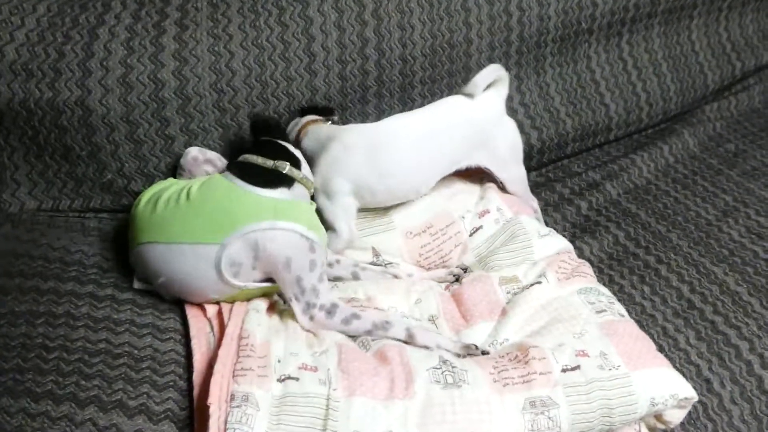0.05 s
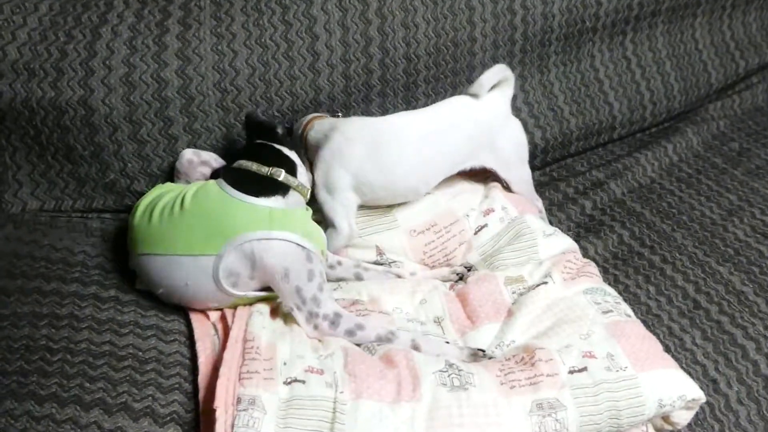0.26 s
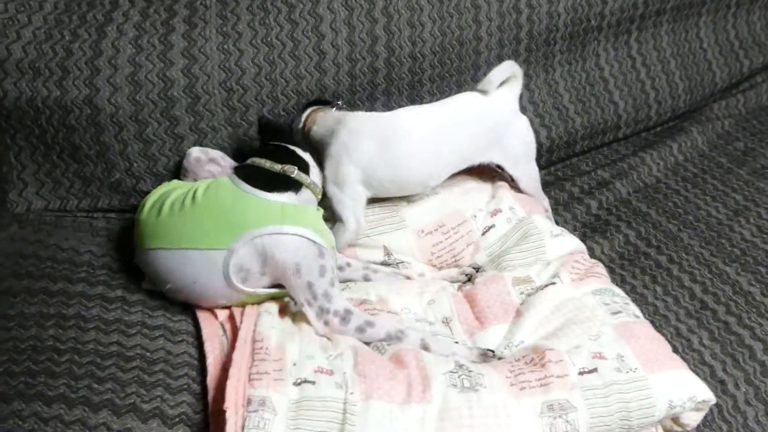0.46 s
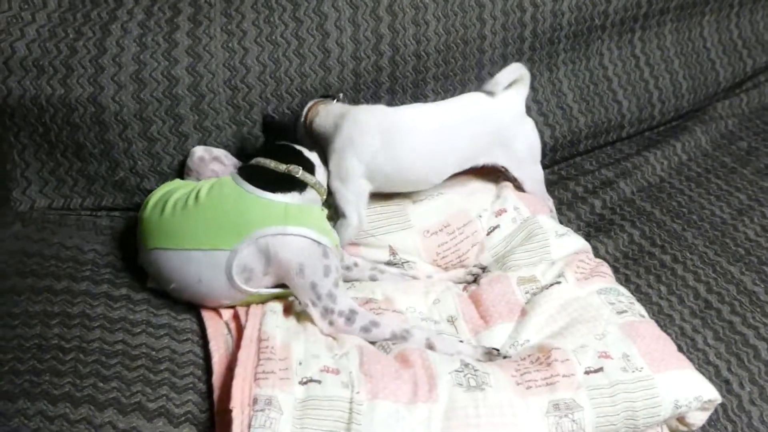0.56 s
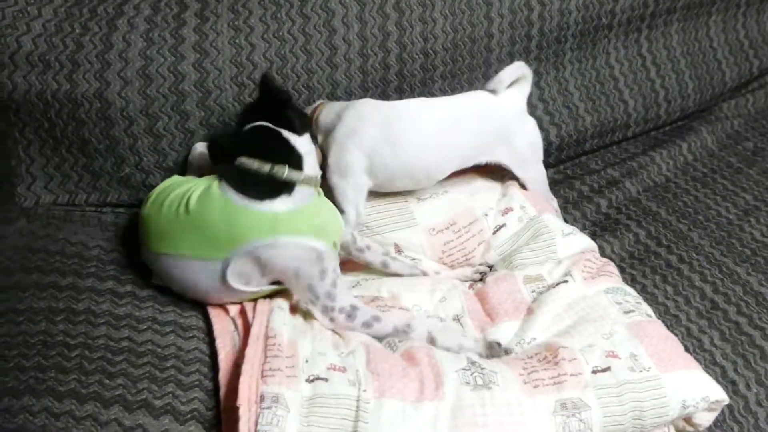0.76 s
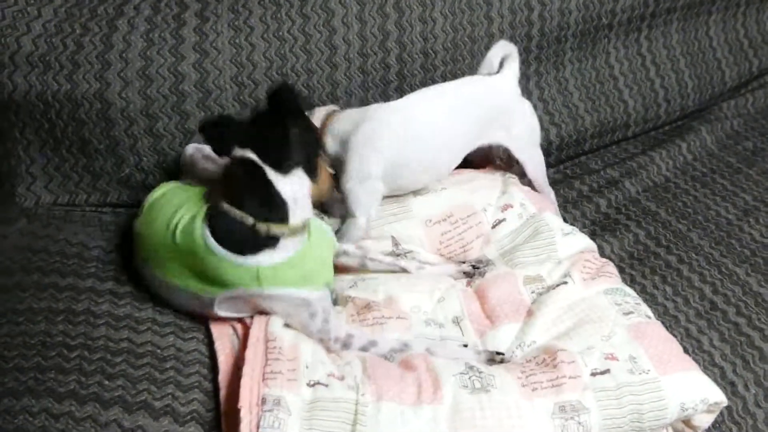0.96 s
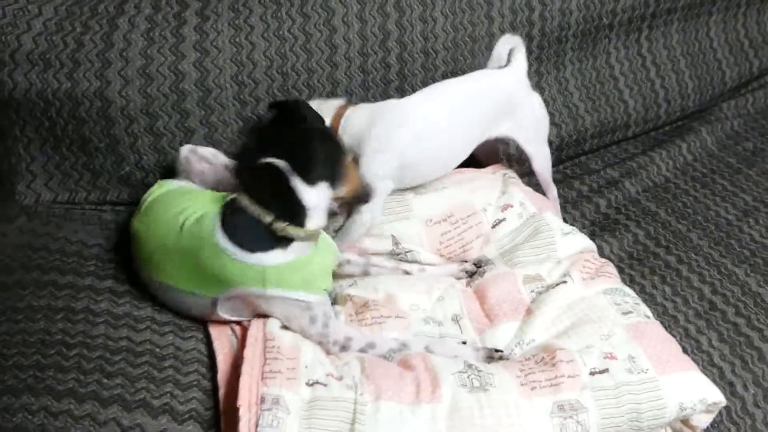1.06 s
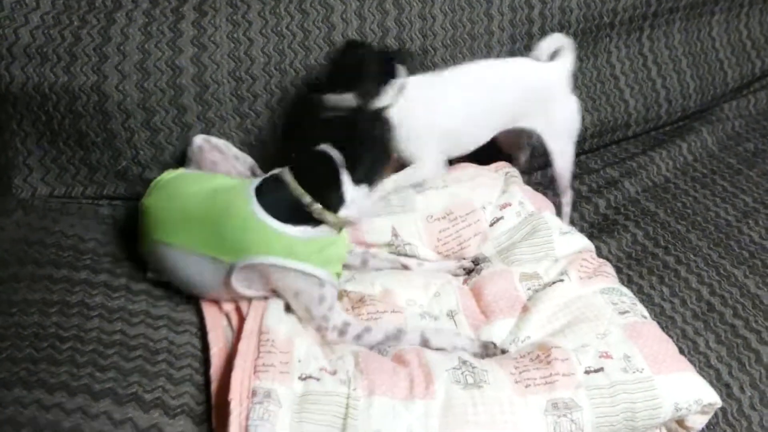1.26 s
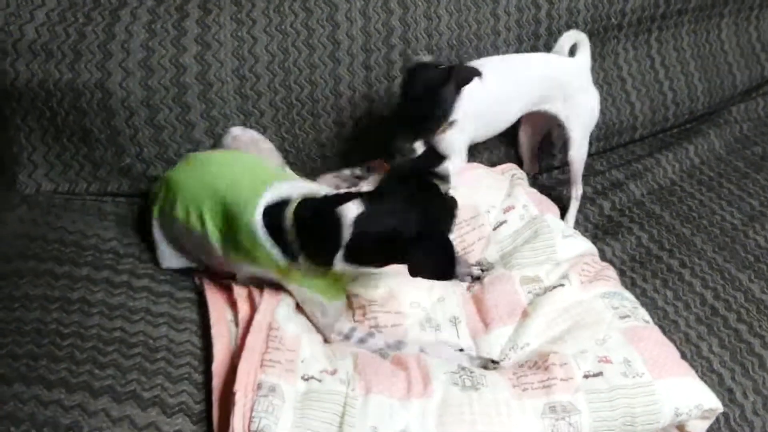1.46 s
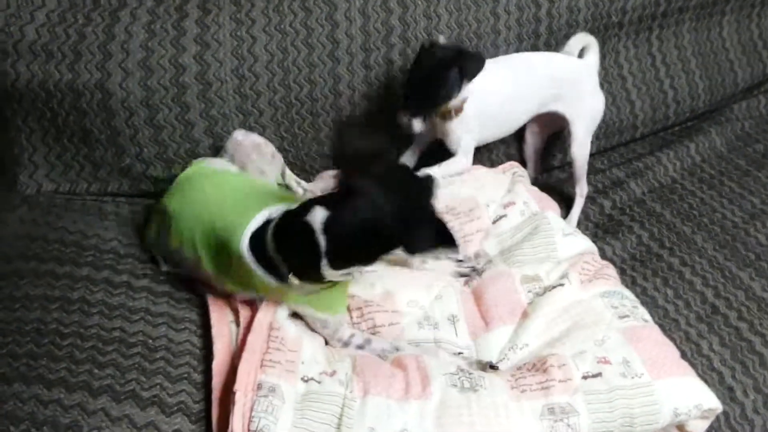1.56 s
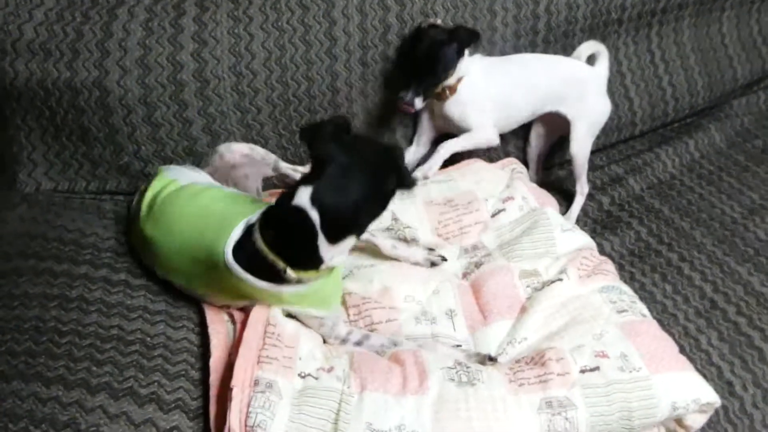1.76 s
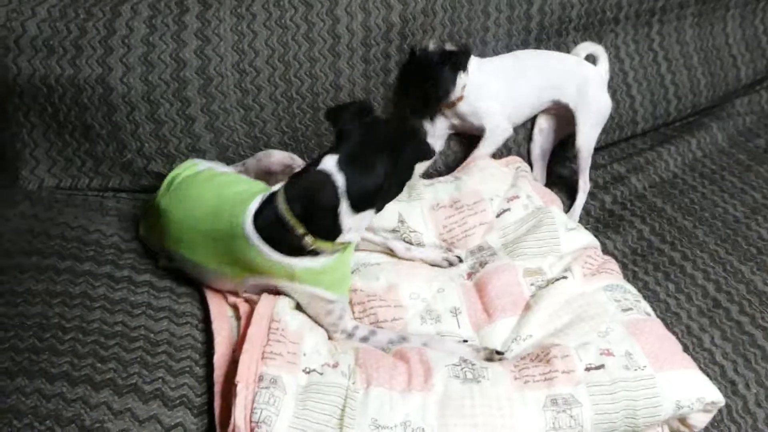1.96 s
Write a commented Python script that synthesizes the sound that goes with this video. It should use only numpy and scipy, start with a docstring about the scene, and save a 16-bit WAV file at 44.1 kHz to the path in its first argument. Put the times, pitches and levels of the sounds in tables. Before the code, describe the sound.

A small collar bell jingles in quick pings as two dogs tussle on a sofa.

```python
"""Two small dogs tussling on a sofa

A little collar bell with a loose pellet, damped by fur, jingles in quick pings.
At the height of the game one dog gives a fluttering snort and a hissing puff through its nose.
Mouths click, paws thud on the cushion, claws tick and fur rustles against a quilt.
Behind it all is a quiet room with a faint hum."""
import sys
import numpy as np
from scipy import signal
from scipy.io import wavfile

SR = 44100
rng = np.random.default_rng(int(sys.argv[2]) if len(sys.argv) > 2 else 0)


def digitize_waveform(pressure):
    """Quantize a signal to 16-bit integers and store it at the path in sys.argv[1].

    Rows of a 2-D input are taken as channels; values are limited to [-1, 1].
    """
    field = np.atleast_2d(pressure).T
    bounded = np.clip(field, -1, 1)
    quanta = np.round(bounded * 32767).astype(np.int16)
    wavfile.write(sys.argv[1], SR, quanta)


N = 88200
T = np.arange(N) / SR

# Quick pings of the collar bell: strikes and their close echoes.
# start_s, level_db, upper_tones_db, ring_s (the time a sound takes to fade by 60 dB)
BELL_PINGS = [(0.0675, -52.5, 14, 0.036), (.076, -51.5, 17, 0.019), (.113, -46, 13.5, 0.046),
              (0.122, -53, -4, 0.014), (.166, -35.5, 1, 0.044), (0.2043, -30.5, 1.5, 0.024),
              (.2115, -34.5, -8, 0.038), (.229, -27.5, -8, 0.017), (0.237, -26.5, -1, 0.011),
              (.3125, -38.5, 2, 0.02), (0.3233, -27, -8, 0.0081), (.350, -36, -5, 0.018),
              (0.3849, -27, -20, 0.021), (.3895, -22, -14, 0.027), (.3985, -25.5, -20, 0.013),
              (.4145, -34, -16, 0.014), (.431, -37, -16, 0.035), (0.4483, -30, -17, 0.022),
              (.456, -29, 5, 0.011), (.470, -33.5, -4, 0.037), (0.497, -28.5, -17, 0.017),
              (.579, -29.5, -17, 0.021), (.6015, -38.5, -19, 0.032), (0.616, -29.5, -15, 0.015),
              (0.6229, -29, -21, 0.035), (.6295, -24.5, 3.5, 0.017), (.6825, -26, 3, 0.014),
              (.6985, -26.5, 2, 0.016), (.7028, -24, -12, 0.024), (.720, -36, -12, .025),
              (.7362, -24, -10, 0.035), (.749, -12.5, 0, 0.018), (.7575, -20.5, -27, 0.043),
              (.7615, -21, -22, 0.044), (.7765, -26.5, -19, 0.02), (.8639, -48.5, 18, 0.035),
              (.8815, -32.5, -6, 0.036), (0.9457, -36.5, 4, 0.025), (.9842, -39.5, 10, 0.014),
              (0.9914, -40.5, 4.5, 0.069), (1.1139, -31, 0.5, 0.018), (1.184, -44.5, -18, 0.1),
              (1.2005, -21.5, -5, 0.022), (1.2085, -22.5, -3, 0.038), (1.2505, -22.5, 4, 0.015),
              (1.2555, -17, -24, 0.018), (1.2655, -28.5, -6, .04), (1.2968, -15.5, -3.5, 0.011),
              (1.357, -36, 10, 0.022), (1.397, -27.5, 10, 0.047), (1.4, -15, 10.5, 0.0091),
              (1.4384, -31, -16, 0.026), (1.563, -45, -10, 0.023), (1.5705, -38.5, -17, 0.028),
              (1.5776, -22.5, -8, 0.01), (1.6568, -36.5, -4, 0.039), (1.6888, -14, -18, 0.0098),
              (1.7105, -29.5, -15, 0.025), (1.7265, -19.5, -32, 0.012)]
# The bell's main tone and its two upper tones: pitch_hz, level_db, share_of_ring_time
BELL_TONES = [(6555, 3.5, 0.93), (6776, -4.5, 1), (6928, -8, 0.84)]


def collar_bell():
    """The shell rings briefly at each ping, then twice more softly as its loose pellet bounces."""
    attack_s, bounce_gap_s, bounce_db = 0.0008, 0.008, -12
    shell, contact, shimmer = np.zeros((3, N))
    fade_in = 1 - np.exp(-T[:N // 16] / attack_s)
    for start_s, db, upper_db, ring_s in BELL_PINGS:
        for bounce in range(3):
            tuning = 1 + 0.0068 * rng.standard_normal()   # fur pulls the pitch a little
            loudness = from_db(db + bounce_db * bounce) * fade_in
            for k, (hz, tone_db, share) in enumerate(BELL_TONES):
                extra_db = (k > 0) * (upper_db + 2 * rng.standard_normal())
                tone = ring(hz * tuning, share * ring_s)
                add(shell, start_s, loudness * from_db(tone_db + extra_db) * tone)
            add(contact, start_s, loudness * burst(ring_s=0.017))
            add(shimmer, start_s, loudness * burst(ring_s))   # a cluster of very high shell tones
            start_s += bounce_gap_s * rng.uniform(.5, 1.5)
    return (butter(shell, (5410, 8570), "band")   # the range a small shell sends out well
            + from_db(-20) * butter(contact, (7560, 10400), "band")
            + from_db(-23) * butter(shimmer, (15000, 16600), "band"))


# Flutters of the snort: start_s, level_db
SNORT_FLUTTERS = [(1.2831, -24), (1.2866, -22.5), (1.2929, -23), (1.3, -33)]
# Tones that ring in the muzzle: pitch_hz, level_db, ring_s
MUZZLE_TONES = [(215, -11, 0.072), (1326, -11, 0.032), (2380, -5, 0.0098), (2710, -3, 0.0083),
                (3860, -8.5, 0.0057)]


def snort():
    """A few quick pulses of air ring the muzzle."""
    pulses = [(start_s, db, 0) for start_s, db in SNORT_FLUTTERS]
    return cavity_pulses(pulses, MUZZLE_TONES, scatter_db=2.5, air_db=-22)


def snort_thump():
    """Each flutter of the snort also pushes a little air, making a low thump."""
    out = np.zeros(N)
    for start_s, db in SNORT_FLUTTERS:
        add(out, start_s, from_db(db - 26) * ring(hz=78, ring_s=0.073))
    return out


# Tone colour of the rushing breath: pitch_hz, level_db
BREATH_COLOUR = [(60, -2), (250, -10), (600, 1.5), (1400, 3.5), (2700, -1), (4100, 5), (5100, 2), (7500, 0),
                 (10500, -21), (12500, -27), (16000, -19)]
# Tone colour of the thin hiss at the nostrils: pitch_hz, level_db
HISS_COLOUR = [(3000, -32), (6000, -19), (8500, 7), (10200, 11), (12500, 0), (16000, -21)]
# Narrow bands where the nose rings: pitch_hz, width_hz, level_db
NOSE_BANDS = [(2660, 240, -8), (3930, 270, -16), (5080, 130, -7.5), (9050, 170, -16), (9940, 450, -7.5)]


def nose_puff():
    """Air blown through the nose: a rasp that swells and dies away, thinning to a hiss."""
    start_s, hold_s, length_s = 1.362, 0.0073, 0.12
    t = np.maximum(T - start_s, 0)

    def swell(db, attack_s, fall_db_per_s):
        """Loudness that rises, holds briefly and falls."""
        rise = np.minimum(t / attack_s, 1) ** 1.6
        return rise * from_db(db - fall_db_per_s * np.maximum(t - attack_s - hold_s, 0))

    nose = 0
    for hz, width, db in NOSE_BANDS:
        band = butter(rng.standard_normal(N), (hz - width / 2, hz + width / 2), "band", order=1)
        nose += from_db(db) * rms_one(band)
    flap_hz = 190 * (1 + .3 * drift(per_s=190))   # the nostrils flap unevenly
    flap_db = 2 * np.sin(2 * np.pi * np.cumsum(flap_hz) / SR)
    rasp = (coloured_noise(BREATH_COLOUR) + butter(nose, 11300, "low", order=4)) * from_db(flap_db)
    hiss = coloured_noise(HISS_COLOUR) * from_db(2.5 * drift(per_s=500))   # moisture makes it sputter
    rasp *= swell(db=-35.5, attack_s=0.033, fall_db_per_s=215)
    hiss *= swell(db=-48.5, attack_s=0.042, fall_db_per_s=113)
    breath_runs_out = from_db(-301 * np.maximum(t - length_s, 0))
    return (rasp + hiss) * breath_runs_out


# Wet clicks of the mouths: start_s, level_db, brightness_db_per_octave
MOUTH_CLICKS = [(.0998, -46, -2), (.1075, -63, 2), (.1215, -57, 5.5), (1.8442, -52, 0), (1.8718, -47.5, 2)]
# Tones that ring in the mouth: pitch_hz, level_db, ring_s
MOUTH_TONES = [(254, -0.5, 0.029), (750, 4, 0.016), (1460, -5, 0.024), (2200, 4, 0.0062),
               (2520, 4.5, 0.015), (5230, 3, 0.0057)]


def mouth_clicks():
    """Each wet smack briefly rings the hollow of the mouth."""
    return cavity_pulses(MOUTH_CLICKS, MOUTH_TONES, scatter_db=3.5, air_db=-29)


# Paws landing: start_s, level_db, pitch_hz, pat_db, ring_s
PAW_LANDINGS = [(1.221, -39, 217, -25, 0.033), (1.3477, -33, 360, -1.5, .035),
                (1.375, -51, 168, -13, 0.056), (1.42, -33.5, 220, -10, .05)]


def paws():
    """A paw lands with a soft pat and the cushion gives a dull ring."""
    out = np.zeros(N)
    for start_s, db, hz, pat_db, ring_s in PAW_LANDINGS:
        pat = butter(burst(ring_s=0.0062), (hz, 3 * hz), "band")
        pat /= np.abs(pat).max()
        add(out, start_s, from_db(db) * (ring(hz, ring_s) + from_db(pat_db) * pat))
    return out


# Ticks of claws and collar fittings: start_s, level_db, lowest_hz, highest_hz
CLAW_AND_COLLAR_TICKS = [(0.385, -34.5, 4800, 9500), (0.451, -36, 5070, 9400), (0.6184, -39, 7000, 11400),
                         (0.678, -36, 1000, 9000), (.7308, -33, 4500, 5530), (0.7308, -35, 1090, 7700),
                         (0.7473, -33, 4050, 5240), (0.7565, -50, 7000, 10800), (0.856, -40, 6000, 10000),
                         (0.984, -37.5, 7000, 9700), (1.194, -32, 11400, 13600), (1.4003, -29, 7450, 10700),
                         (1.556, -37, 7040, 10000)]


def ticks():
    """Claws and collar fittings make tiny dry contacts, each with its own brightness."""
    out = np.zeros(N)
    for start_s, db, low_hz, high_hz in CLAW_AND_COLLAR_TICKS:
        add(out, start_s, from_db(db) * butter(burst(ring_s=0.009), (low_hz, high_hz), "band"))
    return out


# How loudly fur rubs on the quilt: time_s, level_db
RUSTLE_LOUDNESS = [(0, -56), (.34, -57), (.40, -54.5), (.46, -52.5), (.55, -56.5), (.63, -54.5),
                   (.67, -54.5), (.75, -50.5), (.82, -52.5), (.9, -53.5), (1.07, -54), (1.17, -51.5),
                   (1.21, -49.5), (1.33, -47.5), (1.45, -45.5), (1.52, -48.5), (1.6, -49.5), (1.8, -53),
                   (2, -51.5)]
# Tone colour of the cloth: pitch_hz, level_db
CLOTH_COLOUR = [(60, -20), (220, 17.5), (500, 9), (1500, 4), (4000, -3), (7500, 0), (10000, -15),
                (13000, -5), (16000, -37)]


def quilt_rustle():
    """Fur and cloth catch and slip in fine grains."""
    grain_db = 1.5 * drift(per_s=170)
    return from_db(at_times(RUSTLE_LOUDNESS) + grain_db) * coloured_noise(CLOTH_COLOUR)


# How loudly a body slides: time_s, level_db
SLIDE_LOUDNESS = [(1.66, -85), (1.77, -55.5), (1.86, -62), (2, -61)]


def cushion_slide():
    """A dog slides over the cushion with a dull swish."""
    swish = butter(rng.standard_normal((2, N)), (480, 960), "band")
    return from_db(at_times(SLIDE_LOUDNESS)) * rms_one(swish)


# Tones of the hum: pitch_hz, level_db
HUM_TONES = [(205, -67.5), (300, -60.5), (400, -76)]
# Tone colour of the room's hiss: pitch_hz, level_db
ROOM_COLOUR = [(25, -12), (60, -4.5), (130, -0.5), (200, 1), (320, 7.5), (500, 8.5), (900, -9), (2000, -7),
               (3400, -47), (5000, -7), (10000, -13.5), (13000, -15), (16000, -22)]


def room_tone():
    """Soft hiss and the wavering hum of an appliance."""
    hum, left_right_phase = 0, np.array([[0], [1.4]])
    for hz, db in HUM_TONES:
        waver = 0.84 * drift(per_s=8.13)
        hum += from_db(db) * np.sqrt(2) * np.sin(2 * np.pi * hz * T + waver + left_right_phase)
    return hum + from_db(-57) * coloured_noise(ROOM_COLOUR)


# Echoes from nearby surfaces: delay_s, relative_level_db
NEAR_ECHOES = [(.0076, -3), (.0102, -18.5), (.0135, -34), (.0195, -37), (.027, -20)]


def room(sound, echo_db, tail_db):
    """A sound arrives directly, then as a few echoes and a short blurred tail."""
    ring_s, tail_delay_s = 0.16, 0.0062
    t = T[:N // 4]
    tail = rng.standard_normal((2, len(t))) * from_db(-60 * t / ring_s) * (t > tail_delay_s)
    response = from_db(tail_db) * stereo(*rms_one(tail), alike=0.87) / np.sqrt(len(t))
    response[:, 0] += 1   # the direct sound
    for delay_s, db in NEAR_ECHOES:
        response[:, int(delay_s * SR)] += from_db(db + echo_db)
    return signal.fftconvolve(sound[None], response, axes=1)[:, :N]


# How alike left and right are (1 the same, -1 opposite): pitch_hz, likeness
STEREO_LIKENESS = [(50, -0.35), (150, -0.75), (300, -0.64), (600, -0.6), (1200, -0.54), (3000, 0.39),
                   (6500, 0.56), (10000, 0.24), (15000, 0.23)]


def coloured_noise(colour):
    """Stereo noise of power 1, built band by band to follow a tone colour."""
    out, edges = 0, np.geomspace(22, 17000, 25)
    white = rng.standard_normal((2, 2, N))
    for k, band in enumerate(zip(edges, edges[1:])):
        hz = np.sqrt(band[0] * band[1])
        mid, side = butter(white[k % 2], band, "band", order=3)
        out += from_db(at_hz(colour, hz)) * stereo(mid, side, at_hz(STEREO_LIKENESS, hz))
    return rms_one(out)


def cavity_pulses(pulses, tones, scatter_db, air_db):
    """Short pulses ring a hollow space, each with its own colour and a wisp of air."""
    out = np.zeros(N)
    for start_s, db, db_per_octave in pulses:
        ringing = 0
        for k, (hz, tone_db, ring_s) in enumerate(tones):
            colour_db = db_per_octave * np.log2(hz / 1000) + scatter_db * rng.standard_normal()
            tuning = 1 + 0.026 * rng.standard_normal()   # soft walls shift the pitch
            ringing += (-1) ** k * from_db(tone_db + colour_db) * ring(hz * tuning, ring_s)
        air = from_db(air_db) * butter(burst(ring_s=0.12), 4500, "low")
        add(out, start_s, from_db(db) * (ringing + air))
    return out


def from_db(db):
    """Turn decibels into a multiplier."""
    return 10 ** (np.asarray(db) / 20)


def rms_one(x):
    """Scale a sound to an average power of 1."""
    return x / np.sqrt(np.mean(x ** 2) + 1e-20)


def at_hz(points, hz):
    """Read a table between its rows at one pitch."""
    pitches, values = np.transpose(points)
    return np.interp(np.log(hz), np.log(pitches), values)


def at_times(points):
    """Join a table's points with straight lines over time."""
    return np.interp(T, *np.transpose(points))


def butter(x, hz, kind, order=2):
    """Filter a sound, keeping its lows, its highs or one band."""
    sections = signal.butter(order, np.clip(hz, 10, .45 * SR), kind, fs=SR, output="sos")
    return signal.sosfilt(sections, x + 1e-18)


def add(out, start_s, sound):
    """Mix a sound in at a given time."""
    i = int(np.clip(start_s * SR, 0, N - 1))
    out[i:i + len(sound)] += sound[:N - i]


def dying(ring_s):
    """A fade an eighth of a second long, losing 60 dB every ring_s."""
    return from_db(-60 * T[:N // 16] / ring_s)


def ring(hz, ring_s):
    """One struck tone that fades."""
    fade = dying(ring_s)
    return fade * np.sin(2 * np.pi * hz * T[:len(fade)])


def burst(ring_s):
    """A scrap of noise that fades."""
    fade = dying(ring_s)
    return fade * rng.standard_normal(len(fade))


def drift(per_s):
    """A wandering line that glides between random values."""
    values = rng.standard_normal(N // 40)
    return np.interp(T * per_s, np.arange(len(values)), values)


def stereo(mid, side, alike):
    """Blend two unrelated signals into left and right of a given likeness."""
    alike = np.clip(alike, -1, 1)
    return (np.sqrt(1 + alike) * mid + np.sqrt(1 - alike) * side * np.array([[1], [-1]])) / np.sqrt(2)


def scene():
    """The dogs play in the quiet room."""
    snorting, clicking = snort(), mouth_clicks()
    bright = room(collar_bell(), echo_db=-6, tail_db=-3) + room(ticks(), echo_db=-22, tail_db=0.5)
    dull = room(snorting + paws(), echo_db=-27, tail_db=-1.5) + room(clicking, echo_db=-4, tail_db=-1.5)
    dull = butter(dull, 182, "high", order=4)   # small bodies send out little bass
    return bright + dull + snort_thump() + nose_puff() + quilt_rustle() + cushion_slide() + room_tone()


def record(dry):
    """The left microphone is a little thinner in the bass; the highest treble is cut on both sides."""
    left_bass_db, cutoff_hz = -2.5, 15750
    left = dry[0] + (from_db(left_bass_db) - 1) * butter(dry[0], 960, "low", order=1)
    treble_cut = signal.ellip(10, .2, 80, cutoff_hz, fs=SR, output="sos")
    return signal.sosfilt(treble_cut, np.array([left, dry[1]]))


dry = scene()
out = record(dry)
digitize_waveform(out)
```